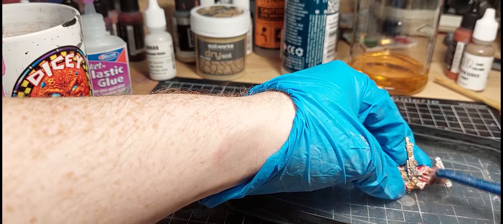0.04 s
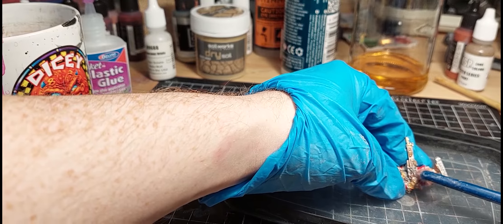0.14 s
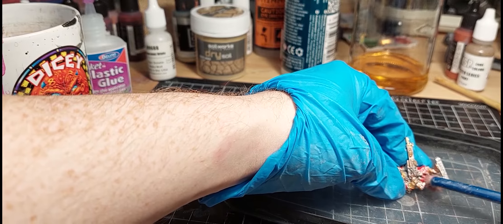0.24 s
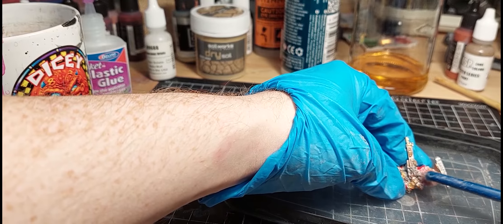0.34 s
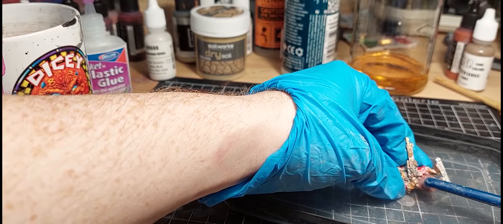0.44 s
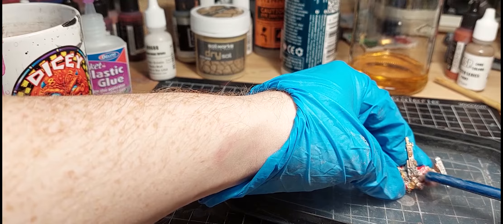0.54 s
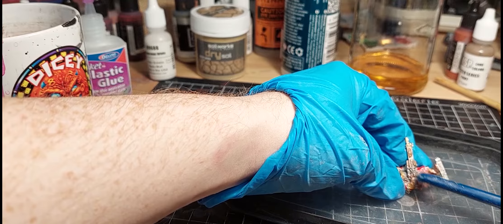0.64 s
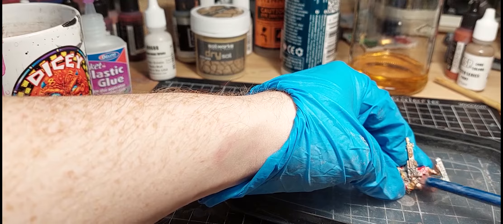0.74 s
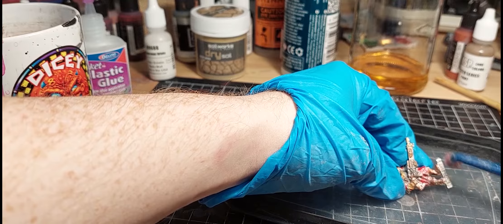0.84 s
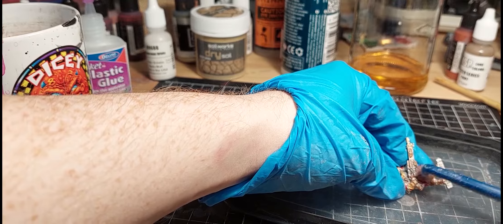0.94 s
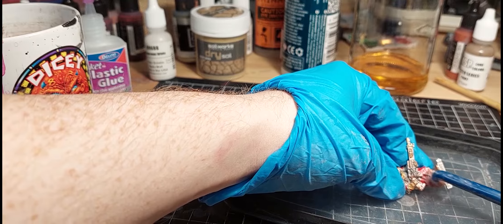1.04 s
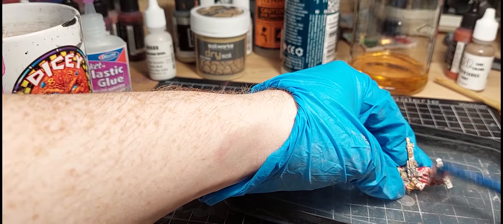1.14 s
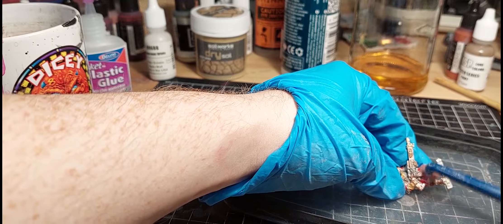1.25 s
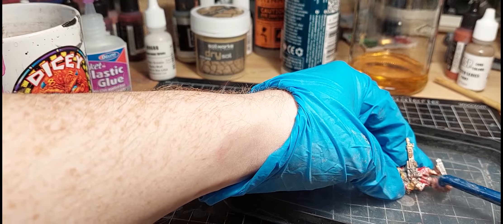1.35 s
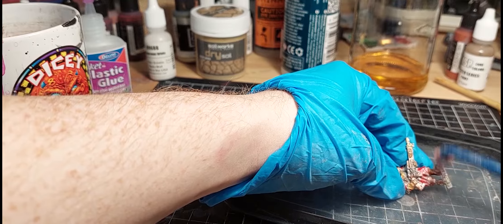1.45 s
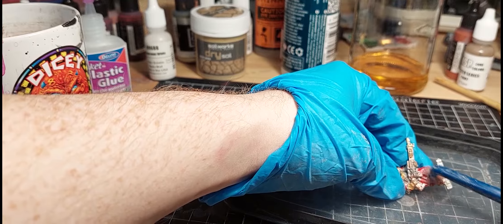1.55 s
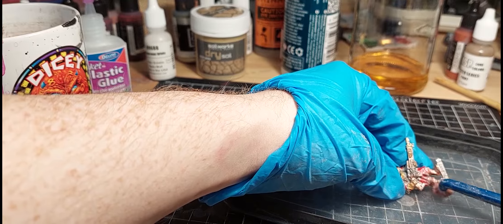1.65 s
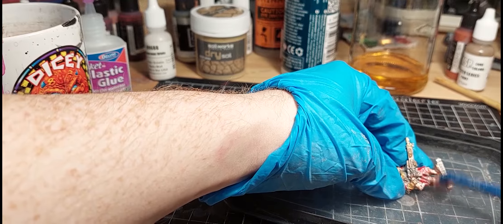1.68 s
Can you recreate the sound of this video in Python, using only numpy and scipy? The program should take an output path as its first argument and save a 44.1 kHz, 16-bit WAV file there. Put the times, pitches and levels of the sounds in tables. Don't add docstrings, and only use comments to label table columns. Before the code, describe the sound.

Close to a stereo microphone, a small stiff brush scrubs a wet plastic miniature in short, irregular strokes. Dense bristle ticks fizz brightly, and stiff tufts snap off ridges with tiny plastic rings. The figure scrapes and skids on a cutting mat, and soft low knocks come from the hollow table below, clustered before one second and near three. The scrubbing thins around four and a half seconds, then grows vigorous again. A quiet small room hums behind.

```python
import sys
import numpy as np
from scipy import signal
from scipy.fft import rfft, irfft, next_fast_len
from scipy.io import wavfile
from scipy.ndimage import uniform_filter1d, map_coordinates

SR = 44100
rng = np.random.default_rng(int(sys.argv[2]) if len(sys.argv) > 2 else 0)


def generate_wav(sig):
    pcm = np.round(np.clip(np.atleast_2d(sig).T, -1, 1) * 32767).astype(np.int16)
    wavfile.write(sys.argv[1], SR, pcm)


def amplitude_ratio(level_db):
    exponent = np.asarray(level_db, float) / 20
    return 10 ** exponent


N = 302967


def unit(x):
    return x / np.sqrt(np.mean(x ** 2) + 1e-20)


def along(points, hz):
    f, v = np.transpose(points)
    return np.interp(np.log(hz + 1), np.log(f + 1), v)


def curves(rows):
    s, *cols = np.transpose(rows)
    return [np.interp(np.arange(N) / SR, s, c) for c in cols]


def filtered(x, response):
    m = next_fast_len(N + SR // 2)
    return irfft(rfft(x, m) * response(np.fft.rfftfreq(m, 1 / SR)), m)[..., :N]


def bass_cut(f, corner_hz, power=4):
    return f ** power / (f ** power + corner_hz ** power)


def modes(table, f):
    total = 0
    for k, (hz, width, db) in enumerate(table):
        total = total + (-1) ** k * amplitude_ratio(db) * 1j * f * width / (hz * hz - f * f + 1j * f * width)
    return total


def wobble(rate, order=3):
    knots = rng.standard_normal(int(N * rate / SR) + 4)
    return map_coordinates(knots, [np.arange(N) * rate / SR], order=order)


def swells(s, db, rise, fall):
    t = np.arange(0, N / SR, 1 / 1000)
    shape_db = db - 10 * np.abs((t - s) / np.where(t < s, rise, fall)) ** 1.5
    return np.interp(np.arange(N) / SR, t, np.sqrt(np.sum(amplitude_ratio(2 * shape_db), axis=0)))


# (f/Hz, level/dB per Hz)
HUM_COLOUR = [(18, -30), (75, 2), (150, 3.5), (509, -6), (698, -10), (1570, -17.5), (1790, -16),
              (4610, -26.5), (5990, -26.5), (12800, -29), (15800, -41)]


def hum():
    colour = lambda f: amplitude_ratio(along(HUM_COLOUR, f)) * [f * 0 + 1, np.clip(f / 900, .5, 1)]
    middle, side = filtered(rng.standard_normal((2, N)), colour)
    return amplitude_ratio(-69 + 0.21 * wobble(4.55, order=1)) * unit(np.array([middle + side, middle - side]))


# (t/s of peak, bristle level/dB, length/s, scrape level/dB re bristle)
LANDINGS = [(.007, -39.5, 0.048, -19.5), (0.36, -44.5, 0.02, -20.5), (0.65, -59, .072, -13),
            (1.028, -32, 0.0084, -5), (1.03, -35.5, 0.074, -13), (1.245, -60.5, 0.056, -12),
            (1.296, -34, 0.061, -15.5), (1.521, -52, 0.011, -20), (1.842, -52.5, 0.1, -16),
            (1.887, -35, 0.064, -13), (2.087, -47.5, 0.038, -5.5), (2.438, -39.5, 0.02, -21),
            (3.345, -55.5, 0.12, -19), (3.992, -35.5, 0.051, -23), (4.198, -50, 0.014, -20),
            (4.277, -56, 0.057, -7.5), (4.543, -63, 0.049, 18), (4.748, -45, 0.0098, -27),
            (5.248, -51, 0.077, -24), (5.57, -36, 0.052, -38), (5.845, -43, 0.061, -7.5),
            (5.882, -37.5, 0.1, -8.5), (6.115, -36, 0.017, -13.5), (6.86, -44.5, 0.094, -12)]
SWEEPS = [(0.076, -39, 0.046, -23.5), (0.242, -38, 0.077, -22.5), (0.552, -48, 0.32, -23),
          (0.598, -33.5, 0.028, -33), (0.985, -49.5, 0.1, -13.5), (1.583, -37, 0.065, -17.5),
          (1.674, -53, 0.027, -30), (2.192, -39, 0.031, -21), (2.69, -34.5, 0.012, -17.5),
          (2.848, -38, 0.1, -14), (2.948, -41.5, 0.056, -5), (3.036, -37.5, 0.026, -23.5),
          (3.133, -40.5, 0.03, -15), (3.484, -42.5, 0.057, -14.5), (3.621, -49, 0.15, -18.5),
          (4.005, -46, 0.13, -14), (4.206, -52, 0.12, -9), (4.432, -61, 0.22, -8),
          (5.055, -46, 0.061, -20.5), (5.172, -54, 0.057, -20), (5.362, -37, 0.057, -17),
          (5.605, -34.5, 0.058, -16), (2.04, -67, 0.043, -24), (1.808, -55.5, 0.015, -32),
          (5.657, -41, 0.067, -10), (4.36, -69, .2, -25), (3.652, -53, .012, -20), (5.918, -30, 0.044, -7),
          (6.157, -38, 0.062, -5), (6.339, -38.5, 0.04, -15.5), (6.769, -33.5, 0.047, -11),
          (6.802, -29, 0.027, -12)]
DRAGS = [(0.171, -46.5, 0.043, -24), (0.398, -49, 0.069, -26), (0.782, -43.5, 0.35, -11),
         (0.785, -30, 0.035, -16.5), (0.82, -29.5, 0.031, -16), (1.631, -49.5, 0.056, -33),
         (2.009, -43.5, 0.054, -23), (2.21, -41, 0.099, -17), (2.316, -51.5, 0.11, -19),
         (2.474, -42, 0.07, -16), (2.589, -44, 0.066, -20), (2.721, -44, 0.091, -15),
         (3.228, -49, 0.19, -18), (3.519, -41, 0.074, -16.5), (3.749, -38, 0.057, -37),
         (3.783, -38.5, 0.047, -18), (3.877, -47, 0.093, -27), (4.782, -54.5, 0.17, -26),
         (4.882, -37, 0.087, -11.5), (4.984, -49.5, 0.11, -23), (5.313, -37, 0.044, -23),
         (5.441, -48.5, 0.056, -26), (5.703, -55, 0.063, -21), (6.28, -44, 0.092, -16.5),
         (6.38, -32, 0.05, -11), (6.496, -36, 0.092, -11.5), (6.579, -40.5, 0.049, -7.5),
         (6.608, -39.5, 0.048, -5), (6.707, -38.5, 0.077, -12), (5.998, -37, 0.034, -22),
         (5.634, -29, 0.046, -18), (3.63, -48, 0.035, -30), (.09, -55, 0.016, -32)]
# (t/s, level/dB)
HAND_WEIGHT = [(0, -2), (.6, -5.5), (1, 1), (1.6, -5.5), (2.1, 2), (2.7, -2), (3.1, 2), (3.6, -1.5),
               (3.9, -0.5), (4.5, -11), (4.9, -6), (5.4, 1), (5.9, -7.5), (6.2, 2.5), (6.5, -7.5),
               (6.87, 5)]


def pressure():
    s, db, length, scrape_db = np.transpose(LANDINGS + SWEEPS + DRAGS)[:, :, None]
    share = np.repeat([0.26, 0.46, 0.78], [len(LANDINGS), len(SWEEPS), len(DRAGS)])[:, None]
    rise, fall = share * length, (1 - share) * length
    rub_db = db + scrape_db
    drum_db = -54 + 0.42 * (rub_db + 56.5) - 0.5 * np.log2(length / 0.056)
    tips, rub, push = [swells(s, level, rise, fall) for level in (db, rub_db, drum_db)]
    return tips, rub, push * amplitude_ratio(curves(HAND_WEIGHT)[0])


SPOT_LAGS = (9, 10, 0, -12)


def slip_noise(rate, spread_db, clump_db, hiss, burst_s):
    size = (len(SPOT_LAGS), N)
    strength = amplitude_ratio(spread_db * np.minimum(rng.exponential(size=size), 2.5))
    starts = (rng.random(size) < rate / SR) * strength
    slips = signal.lfilter([1], [1, -np.exp(-1 / (burst_s * SR))], starts)
    clumps = amplitude_ratio(clump_db * (wobble(170) + 0.06 * wobble(70)))
    return unit(clumps * (unit(slips) + hiss) * rng.standard_normal(size))


def held(depth_db, hold_s, spill_db, spill_s):
    gain_db, t = np.zeros(N + SR), np.arange(SR // 30) / SR
    for s, db, hz in snap_rows():
        at = round(s * SR)
        gain_db[at - len(t):at] -= depth_db * np.exp(-(t[::-1] / hold_s) ** 2)
        gain_db[at:at + len(t)] += spill_db * np.exp(-t / spill_s)
    return amplitude_ratio(gain_db[:N])


# (f/Hz, level/dB)
BRISTLE_COLOUR = [(1500, -17.5), (2700, -13.5), (3300, -14), (6000, -1.5), (6900, -5), (7700, -3),
                  (8500, -4.5), (10500, -4.5), (12500, -1), (15800, -7.5)]
# (f/Hz, level/dB)
LOOSE_SCRAPE = [(200, -3.5), (600, -14), (1100, -5.5), (1950, 0.5), (2400, -5), (3200, -9), (9000, -23),
                (15000, -42)]
# (f/Hz, level/dB)
TIGHT_SQUEAK = [(600, -12.5), (1500, -80), (2100, -10), (2750, 2), (3300, 1), (9000, -11), (15000, -25)]
# (f/Hz, width/Hz, level/dB)
THICK_MODES = [(3540, 227, 0.5), (4280, 450, -0.5), (4930, 410, -3)]
# (f/Hz, width/Hz, level/dB)
THIN_MODES = [(7800, 350, -11), (9590, 430, 19), (10400, 3100, -13)]
# (f/Hz, width/Hz, level/dB)
RIDGE_MODE = [(5430, 950, 0)]
SPOT_PITCH = (0.985, 1.02, 1, 0.97)
# (t/s, thick parts level/dB, thin parts level/dB, tightness of grip 0-1)
BRUSHED_PARTS = [(0, -13.5, 3.5, 0.5), (.45, -6, 5.5, 0.3), (.8, -1.5, 4, 0.88), (1.31, -2.5, 5, 0.47),
                 (1.59, -0.5, 4.5, 0), (1.89, -1, 4.5, 1), (2.2, 3, 8.5, 0), (2.65, -1.5, 11.5, 0.43),
                 (2.86, 2, 8.5, 0.65), (3.05, 0, 7.5, 0.25), (3.5, -0.5, 9, 0.64), (4.2, 1.5, 3.5, 0.25),
                 (4.55, -14, -5, 0), (4.87, -4, 3, 0.88), (5.04, -15.5, 2, 0.3), (5.62, 3.5, 1.5, 0.88),
                 (6.2, -3.2, 6, 0.97), (6.87, -5.5, 6, 0.81)]
# (t/s, level/dB re the thick parts)
RIDGE_CROSSING = [(0, 7), (.5, 3), (.8, -1), (1.0, -4), (1.3, -4), (1.9, -3), (2.2, 0.5), (2.7, -0.5),
                  (2.86, -4), (3.1, -2), (3.65, 4), (4.0, -5), (4.5, 2), (4.9, 1), (5.3, 2), (5.6, -6),
                  (5.93, 2), (6.87, 3)]


def brush(tips, rub):
    thick_db, thin_db, grip = curves(BRUSHED_PARTS)
    grip, pitch = np.clip(grip, 0, 1), np.array(SPOT_PITCH)[:, None]

    flicks = slip_noise(rate=600, spread_db=4.5, clump_db=1.6, hiss=0.17, burst_s=0.0005)
    colours = lambda f: np.array([amplitude_ratio(along(BRISTLE_COLOUR, f / pitch)),
                                  modes(THICK_MODES, f / pitch) * bass_cut(f, 2600),
                                  modes(RIDGE_MODE, f / pitch) ** 2,
                                  modes(THIN_MODES, f / np.sqrt(pitch)) * bass_cut(f, 7000)])
    fizz, thick, ridge, thin = map(unit, filtered(flicks, colours))
    body = thick + amplitude_ratio(curves(RIDGE_CROSSING)[0] - 2.5) * ridge
    bristles = amplitude_ratio(-4.5) * fizz + amplitude_ratio(thick_db - 10.5) * body + amplitude_ratio(thin_db - 15.0) * thin

    drag = slip_noise(rate=230, spread_db=-4.0, clump_db=2.5, hiss=0.96, burst_s=0.00032)
    grips = lambda f: amplitude_ratio([[along(LOOSE_SCRAPE, f)], [along(TIGHT_SQUEAK, f)]])
    loose, tight = map(unit, filtered(drag, grips))
    scrape = np.sqrt(1 - grip) * loose + np.sqrt(grip) * tight

    catch = held(depth_db=2.5, hold_s=0.0038, spill_db=2.0, spill_s=0.0022)
    return catch * (tips * bristles + amplitude_ratio(-0.5) * rub * scrape)


# (f/Hz, width/Hz, level/dB)
TABLE_MODES = [(230.5, 69, -14), (274.8, 22.5, 6.5), (369, 17, 1), (421.2, 25.6, -3), (498.7, 23, -7),
               (553, 17, -9)]
# (f/Hz, width/Hz, level/dB)
LOW_TABLE_MODES = [(144, 11, 0), (112, 25, -12), (185, 25, -13)]
# (t/s, level/dB)
WRIST_DROPS = [(.18, -62), (.66, -57.5), (0.886, -34), (1.29, -70), (2.09, -69), (2.97, -63), (3.15, -68),
               (3.77, -56.5), (4.05, -51), (4.56, -68), (5.27, -72), (6.12, -63)]


def table_top(push):
    upper = lambda f: modes(TABLE_MODES, f)
    lower = lambda f: modes(LOW_TABLE_MODES, f) * bass_cut(f, 105)
    rub, sway = rng.standard_normal((2, N))
    drum = filtered(push * rub, upper) / np.std(filtered(rub, upper))
    boom = amplitude_ratio(-10.5) * filtered(push * sway, lower) / np.std(filtered(sway, lower))
    s, db = np.transpose(WRIST_DROPS)[:, :, None]
    swing = np.sin(2 * np.pi * 150 * np.arange(N) / SR + 0.53 * wobble(12))
    drops = filtered(swells(s, db, rise=0.048, fall=0.033) * (swing + 7 * sway), lower)
    return amplitude_ratio(-3.0) * drum + amplitude_ratio(2.5) * boom + amplitude_ratio(5.5) * drops + knocks()


# (t/s, peak level/dB)
BRISTLE_TICKS = [(0.0084, -31), (0.092, -41), (0.1471, -45), (0.2258, -26.5), (0.254, -27), (0.3974, -36.5),
                 (0.4105, -31.5), (0.4868, -40), (0.6174, -27), (0.6519, -34), (0.6723, -35), (0.6814, -45),
                 (0.7033, -38), (0.7164, -29), (1.5514, -38), (1.8752, -26), (1.8854, -34), (1.9006, -34),
                 (1.966, -43), (2.0863, -24.5), (2.1969, -28), (2.2054, -36), (2.2137, -29),
                 (2.2322, -30.5), (2.2833, -37), (2.477, -30), (2.5948, -35), (2.7288, -30.5),
                 (3.2294, -32.5), (3.2604, -44), (3.2804, -44), (3.3934, -59), (3.5044, -40), (3.5214, -31),
                 (3.6594, -34.5), (3.7424, -32), (3.7844, -33), (3.825, -46), (3.9325, -46),
                 (3.9556, -34.5), (4.1535, -44), (4.2114, -44), (4.432, -51), (4.7146, -46),
                 (4.8269, -31.5), (4.8724, -32), (4.9586, -49), (4.998, -46), (5.2583, -34), (5.3064, -28),
                 (5.3258, -26), (5.358, -24.5), (5.6164, -23), (5.63, -20.5), (5.6367, -24.5), (5.925, -28),
                 (6.0004, -41), (6.3774, -31)]


def springs():
    out, t = np.zeros(N + SR), np.arange(SR // 50) / SR
    level_db, t60_s, lowest_hz = 3.5, 0.0031, 3420
    noise = rng.standard_normal((len(BRISTLE_TICKS), len(t)))
    for (s, db), burst in zip(BRISTLE_TICKS, noise):
        out[round(s * SR):][:len(t)] += amplitude_ratio(db + level_db - 60 * t / t60_s) * burst
    return filtered(out[:N], lambda f: bass_cut(f, lowest_hz, power=2))


# (t/s, peak level/dB)
RIDGE_SNAPS = [(0.067, -31), (0.2334, -25.5), (0.545, -36), (0.5918, -30), (0.6029, -21), (0.7414, -25),
               (0.77, -23), (0.8074, -30), (0.956, -36), (1, -23), (1.0313, -17.5), (1.292, -35),
               (1.8603, -22.5), (2.1846, -31.5), (2.195, -36), (2.4337, -47), (2.69, -41), (3.472, -45),
               (3.6266, -33), (3.989, -49), (4.7877, -32), (4.8584, -43), (5.343, -23), (5.36, -22),
               (5.5592, -32), (5.8764, -36), (6.117, -33), (6.451, -27.5), (6.757, -40), (6.796, -25)]
# (t/s, peak level/dB, f/Hz)
EDGE_SNAPS = [(0.943, -33.5, 8550), (1.0275, -14.5, 3560), (1.274, -44, 5440), (1.882, -19, 3800),
              (2.0835, -28, 9900), (2.6855, -42, 4310), (2.713, -27, 4330), (2.8716, -13, 2257),
              (2.9347, -30, 2700), (2.9492, -25, 4150), (3.033, -36, 9600), (3.034, -38, 9700),
              (3.126, -49, 5470), (3.2045, -30, 9500), (3.7338, -29, 4260), (4.048, -24.5, 7530),
              (4.1956, -27.5, 6900), (4.7465, -55, 5670), (5.296, -27.5, 9800), (5.569, -38, 4550),
              (5.5805, -30, 4720), (5.6, -22, 7900), (5.918, -21, 4440), (6.1558, -19, 3440),
              (6.333, -42, 4550), (6.3445, -35, 2830), (6.4132, -25, 4800), (6.4916, -31, 2980),
              (6.564, -25.5, 2900), (6.7424, -32, 5040)]


def snap_rows():
    return [(s, db, 5390) for s, db in RIDGE_SNAPS] + EDGE_SNAPS


def snaps():
    out, t = np.zeros(N + SR), np.arange(SR // 50) / SR
    for s, db, hz in snap_rows():
        crack = 0.69 * amplitude_ratio(-60 * t / 0.0037) * rng.standard_normal(len(t))
        ring = 0.97 * amplitude_ratio(-60 * t / 0.0049) * np.sin(2 * np.pi * hz * t)
        out[round(s * SR):][:len(t)] += amplitude_ratio(db - 3.0) * (crack + ring)
    return filtered(out[:N], lambda f: bass_cut(f, 1300, power=2))


# (t/s of peak, level/dB, length/s, f/Hz)
SKIDS = [(0.611, -58.5, .03, 1710), (1.039, -47, 0.031, 1810), (1.6, -66, 0.055, 1790),
         (1.899, -47.5, 0.034, 2100), (2.85, -40.5, 0.031, 2390), (2.88, -45.5, 0.041, 2430),
         (2.934, -42, 0.011, 2500), (2.954, -47.5, .035, 2000), (3.503, -65, 0.063, 2060),
         (3.774, -57, 0.067, 2050), (4.002, -59, .05, 2000), (4.149, -62, 0.011, 2200),
         (4.284, -54, 0.0092, 1890), (4.305, -65, 0.0071, 1930), (4.431, -56, .008, 2100),
         (4.544, -51, 0.053, 1060), (4.823, -57.5, .04, 1960), (5.843, -60, 0.066, 2000),
         (5.91, -61, 0.035, 1950), (6.368, -53, 0.0079, 1870), (6.493, -47, 0.046, 2500)]


def skids():
    out, t = np.zeros(N + SR), np.arange(SR // 4) / SR - .08
    f = np.fft.rfftfreq(len(t), 1 / SR)
    sharpness, judder_db = 2.2, 3.5
    judder = amplitude_ratio(judder_db * wobble(240))
    for s, db, length, hz in SKIDS:
        colour = modes([(hz, hz / sharpness, 0)], f) ** 2
        ring = unit(irfft(rfft(rng.standard_normal(len(t))) * colour, len(t)))
        side = np.where(t < 0, .3 * length, 0.48 * length)
        out[round((s + t[0]) * SR):][:len(t)] += ring * amplitude_ratio(db - 10 * np.abs(t / side) ** 1.5)
    return judder * out[:N]


# (t/s, peak level/dB, favoured f/Hz, lowest mode level/dB, plastic clack level/dB re peak)
KNOCKS = [(0.828, -25, 252, -16, -31), (0.856, -28, 290, 8, -24), (0.864, -23, 327, -6, -23),
          (0.876, -33.5, 415, -16, -30), (0.908, -31, 270, -8, -28), (2.089, -31.5, 253, -9, -44),
          (2.876, -28, 299, -21, -20), (2.949, -28.5, 370, -21, -1.5), (2.96, -30, 369, -24, -27),
          (2.982, -33, 418, -31, -22), (3.13, -33, 273, -24, -38), (3.142, -36, 274, -13, -35),
          (3.19, -41.5, 270, -9, -32), (1.04, -46, 560, -22, -16), (1.889, -48, 285, 7, -22),
          (2.19, -37, 275, -24, -25), (2.44, -43, 276, -21, -25), (3.49, -44, 278, -23, -19),
          (5.613, -42.5, 368, -16, -28), (6.795, -34, 372, -12, -28), (4.54, -35, 369, -30, 8.5),
          (4.753, -45, 270, 1, 5.5), (5.051, -46.5, 346, -7.5, 1), (5.913, -32, 369, -14, -18),
          (6.118, -34, 335, -23.5, -31), (6.148, -36, 350, -31, -21), (6.159, -31.5, 366, -32, 0.5),
          (6.376, -30.5, 374, -26, -36), (6.775, -38, 300, -30, 6), (2.686, -38.5, 286.4, -15, -26),
          (1.291, -44, 283, -16, -7)]


def knocks():
    out, t = np.zeros(N + SR), np.arange(SR // 4) / SR
    peak = lambda x: x / np.max(np.abs(x), axis=-1, keepdims=True)
    ring = lambda hz, width: np.exp(-np.pi * width * t) * np.sin(2 * np.pi * hz * t)
    clack = ring(560, 200) - ring(850, 350) + ring(1400, 500)
    shapes = np.array([ring(hz, width) for hz, width, _ in TABLE_MODES + LOW_TABLE_MODES[:1]] + [clack])
    for s, db, centre_hz, low_db, clack_db in KNOCKS:
        chatter = np.minimum(t / 0.005, 1) * amplitude_ratio(-60 * t / 0.084) * rng.standard_normal(len(t))
        force = chatter[:SR // 16]
        levels_db = [-30 * abs(np.log2(hz / centre_hz)) for hz, _, _ in TABLE_MODES]
        levels_db += [low_db + 1, clack_db - 3.5]
        struck = peak(signal.fftconvolve(force[None], shapes, axes=1)[:, :len(t)])
        out[round(s * SR):][:len(t)] += amplitude_ratio(db - 10.0) * amplitude_ratio(levels_db) @ struck
    return filtered(out[:N], lambda f: bass_cut(f, 125))


def nearby(x, lag):
    sparse = rng.random((2, 300)) < .05
    path = 0.89 * rng.standard_normal((2, 300)) * sparse * amplitude_ratio(-np.arange(300) * 0.068)
    path[:, :20] = 0
    path[[0, 1], [max(lag, 0), max(-lag, 0)]] = 1
    path = path / np.linalg.norm(path, axis=1, keepdims=True)
    return signal.oaconvolve(x[None], path, axes=1)[:, :N]


# (f/Hz, t60/s)
ROOM_DECAY = [(300, 0.32), (2000, 0.14), (6000, 0.043), (15000, 0.012)]


def room(x):
    hz, t, z = signal.stft(rng.standard_normal((2, SR // 4)), SR, nperseg=256)
    tail = signal.istft(z * amplitude_ratio(-60 * t / along(ROOM_DECAY, hz)[:, None]), SR, nperseg=256)[1]
    late = np.pad(x, (200, 0))[None]
    return signal.fftconvolve(late, tail / np.linalg.norm(tail[0]), axes=1)[:, :N]


def tilted(x, patchy_db):
    z = signal.stft(x, nperseg=256)[2]
    field = uniform_filter1d(rng.standard_normal(z.shape[1:]), size=7, axis=0)
    field = uniform_filter1d(field, size=35, axis=1)
    return signal.istft(z * amplitude_ratio(patchy_db * unit(field)), nperseg=256)[1][:, :N]


def scene():
    tips, rub, push = pressure()
    share = np.array([amplitude_ratio(4 * wobble(4.5, order=1)) for lag in SPOT_LAGS])
    spots = brush(tips, rub) * share / np.linalg.norm(share, axis=0)
    spots[0] += snaps()
    spots[1] += springs()
    spots[2] += skids()
    direct = sum(nearby(x, lag) for x, lag in zip(spots, SPOT_LAGS))
    heard = direct + amplitude_ratio(-10.0) * room(spots.sum(0))
    figure = amplitude_ratio(-1.5) * tilted(heard, patchy_db=1.03)
    wood = table_top(push)
    return figure + amplitude_ratio([[-1.9], [-0.3]]) * wood + amplitude_ratio(-14) * room(wood) + hum()


def low_pass(x):
    return signal.sosfilt(signal.butter(12, 16400, fs=SR, output="sos"), x)


# (f/Hz, left-right level/dB)
PORT_COLOUR = [(100, 2.5), (1500, -2), (3600, 2), (5500, -0.5), (7700, -4), (10000, 0), (12500, -4),
               (15500, -6)]


def record(dry):
    colour = lambda f: amplitude_ratio(along(PORT_COLOUR, f) * [[.5], [-.5]])
    limits = lambda f: bass_cut(f, 80) * np.clip((15900 - f) / 250, 0, 1)
    mix = filtered(dry, lambda f: colour(f) * limits(f))
    return low_pass(mix)


dry = scene()
out = record(dry)
generate_wav(out)
```